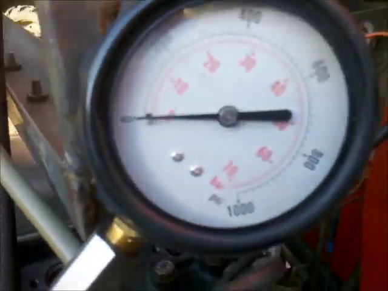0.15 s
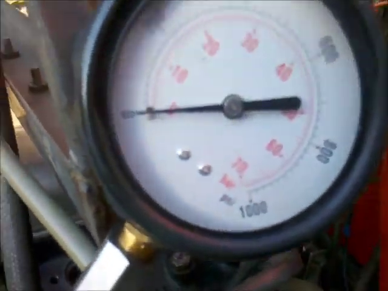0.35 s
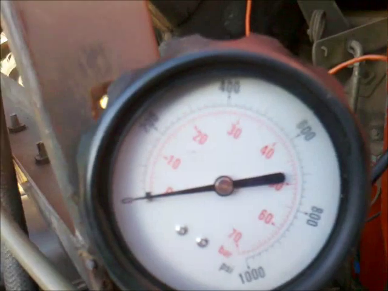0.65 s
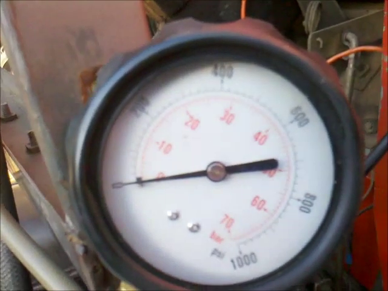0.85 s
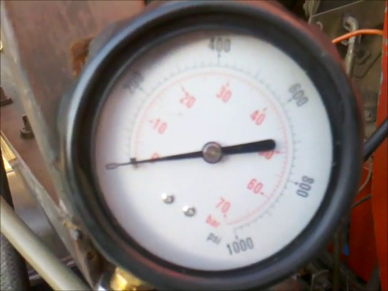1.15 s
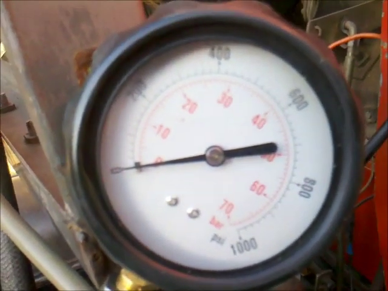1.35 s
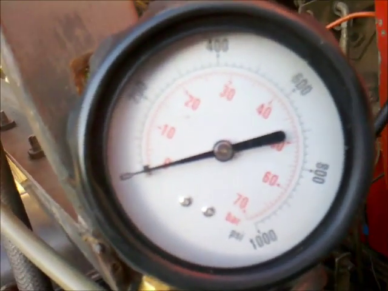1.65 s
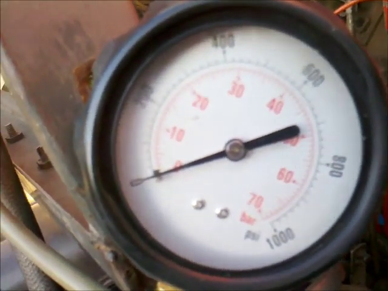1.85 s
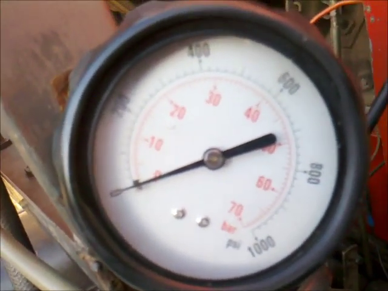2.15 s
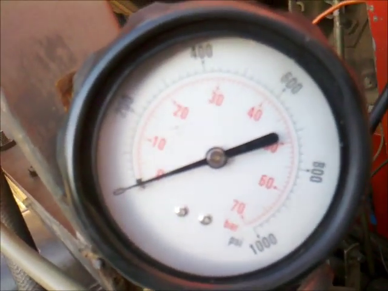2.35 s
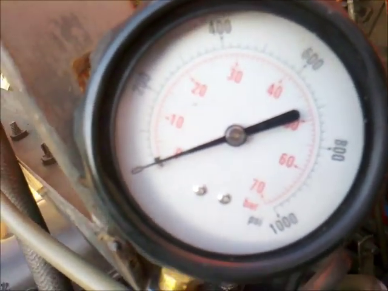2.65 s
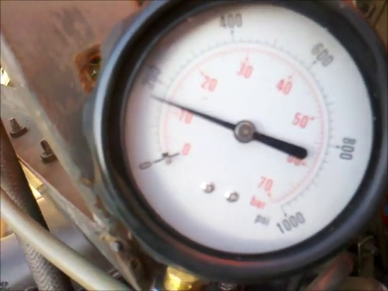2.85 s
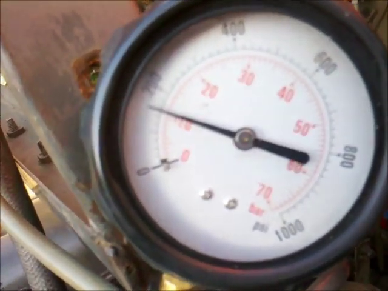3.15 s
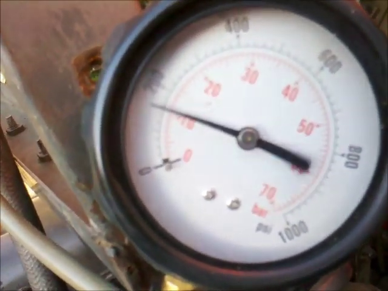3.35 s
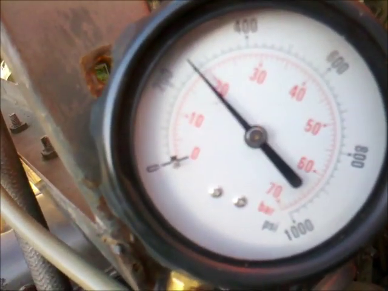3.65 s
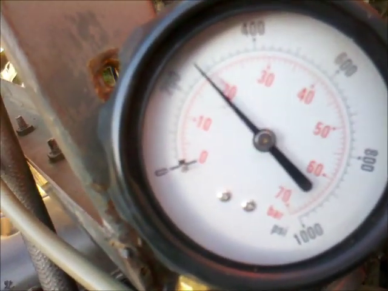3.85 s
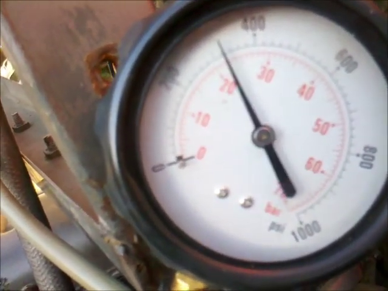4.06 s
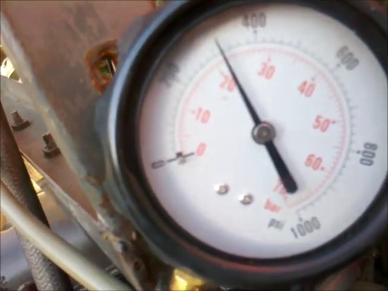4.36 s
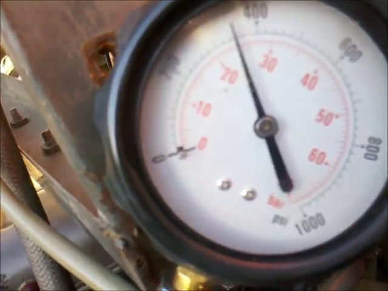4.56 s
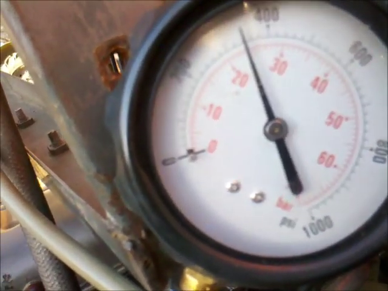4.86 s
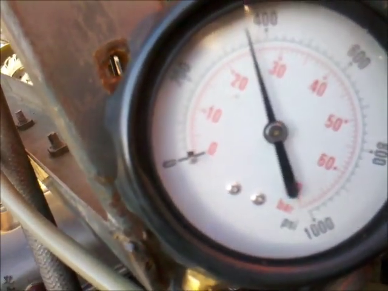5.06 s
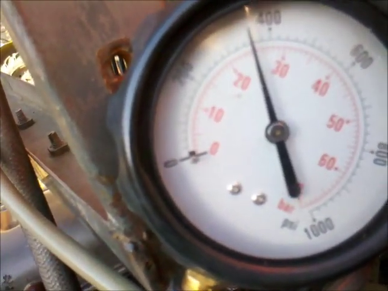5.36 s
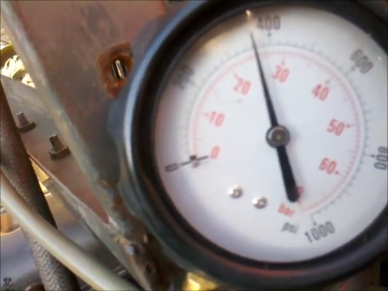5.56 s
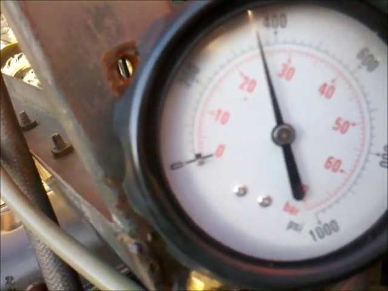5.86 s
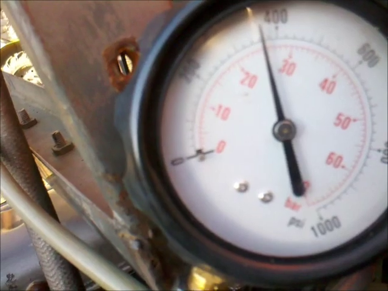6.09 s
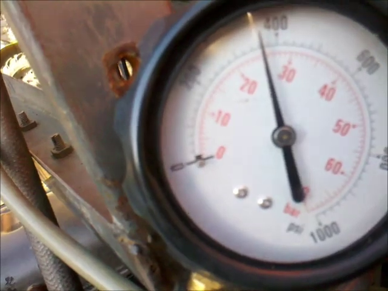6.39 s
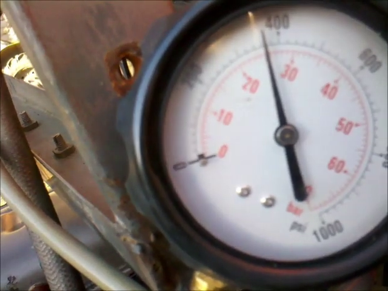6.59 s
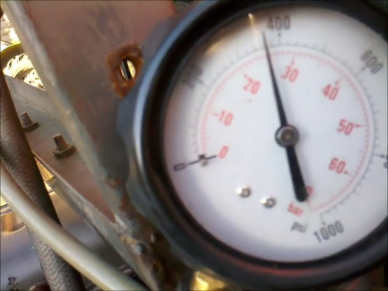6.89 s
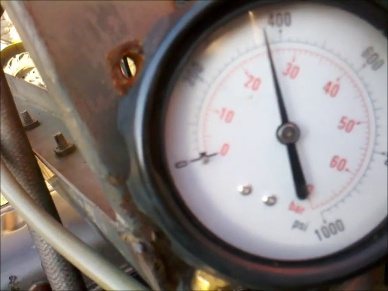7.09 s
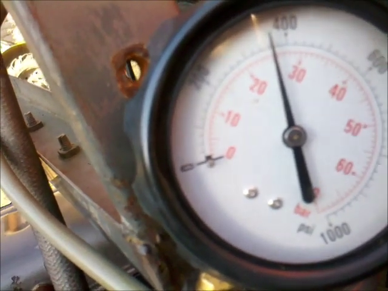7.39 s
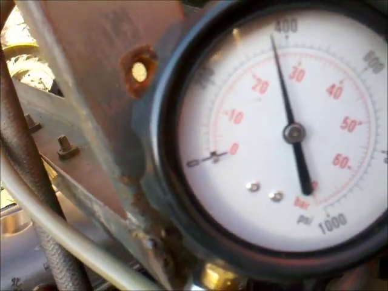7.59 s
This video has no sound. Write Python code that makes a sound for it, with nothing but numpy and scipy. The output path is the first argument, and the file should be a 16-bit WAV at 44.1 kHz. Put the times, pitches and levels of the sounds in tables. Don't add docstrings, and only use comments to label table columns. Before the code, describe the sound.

A slow-cranking diesel chuffs sharp double bursts of air over grinding starter gears, after a quiet opening of chirping sparrows and handling bumps.

```python
import sys
import numpy as np
from scipy import signal
from scipy.fft import rfft, irfft, next_fast_len
from scipy.io import wavfile
from scipy.ndimage import uniform_filter1d

SR = 44100
rng = np.random.default_rng(int(sys.argv[2]) if len(sys.argv) > 2 else 0)


def voltage_ratio(level):
    return 10 ** (np.asarray(level, float) / 20)


def dump_mix(stems):
    frames = np.atleast_2d(stems).T
    limited = np.clip(frames, -1, 1)
    pcm = np.round(limited * 32767).astype(np.int16)
    wavfile.write(sys.argv[1], SR, pcm)


N = 340923
t = np.arange(N) / SR


def evened(x):
    return x / np.sqrt(np.mean(x ** 2) + 1e-20)


def read(points, hz):
    f, value = np.transpose(points)
    return np.interp(np.log(hz + 1), np.log(f + 1), value)


def colour(x, points):
    size = next_fast_len(N)
    gain = voltage_ratio(read(points, np.fft.rfftfreq(size, 1 / SR)))
    return evened(irfft(rfft(x, size) * gain, size)[..., :N])


def air(points):
    return colour(rng.standard_normal((2, N)), points)


def flicker(ms, db):
    size = int(ms * SR / 1000)
    wander = uniform_filter1d(uniform_filter1d(rng.standard_normal(N), size), size)
    return voltage_ratio(db * evened(wander))


def patchy(x, db):
    z = signal.stft(x, nperseg=256)[2]
    patches = uniform_filter1d(rng.standard_normal(z.shape[1:]), size=6, axis=0)
    patches = evened(uniform_filter1d(patches, size=7, axis=1))
    return signal.istft(z * voltage_ratio(db * patches), nperseg=256)[1][:, :N]


def ring(x, hz, width):
    r = np.exp(-np.pi * width / SR)
    return signal.lfilter([1 - r, 0, r - 1], [1, -2 * r * np.cos(2 * np.pi * hz / SR), r * r], x)


def step(u):
    return .5 + .5 * np.tanh(u / 2)


def add(mix, s, sound):
    part = mix[..., round(s * SR):][..., :sound.shape[-1]]
    part += sound[..., :part.shape[-1]]


def shed(x, t60, wet_db):
    age = np.arange(int(.6 * SR)) / SR
    sparse = rng.random((2, len(age))) < .1
    taps = rng.standard_normal((2, len(age))) * sparse * voltage_ratio(-60 * age / t60) * (age > .004)
    taps /= np.linalg.norm(taps[0])
    return x + voltage_ratio(wet_db) * signal.fftconvolve(x * np.ones((2, 1)), taps, axes=1)[:, :N]


# (frequency [Hz], level [dB])
HISS = [(1500, -1), (4000, -16), (6500, 0), (8000, 1), (10300, 8), (11100, 7.5), (12000, 10), (13000, 8),
        (14000, 0.5)]
# (frequency [Hz], level [dB])
ROAR = [(40, -38), (120, -4.5), (350, -1.5), (800, -6.5), (2000, -4.5), (2800, -8), (4200, -3), (4900, -4),
        (5800, -11.5), (8000, -36), (14000, -14)]
# (time [s], length [ms], level [dB])
PUFFS = [(2.888, 79.6, -1), (3.033, 79.2, -0.3), (3.443, 69, -0.5), (3.565, 76.4, -0.2),
         (3.958, 68.3, -0.2), (4.08, 77, 0), (4.475, 65.5, 0.3), (4.588, 81.5, -1.5), (4.983, 72.3, 0),
         (5.102, 84, 0), (5.495, 77, -0.1), (5.625, 79, -1), (6.017, 69.8, 0.2), (6.14, 79, -1.5),
         (6.529, 73, -0.3), (6.655, 77.7, -1.5), (7.046, 74.3, -0.7), (7.168, 79.5, -0.3)]


def cylinders():
    # (length [ms], rise [ms], fall [ms], hiss [dB], roar over hiss [dB]); puffs have their own length
    wheeze, gasp, sigh = (41.5, 42, 1, -29, -8), (51, 13, 15, -31.5, -5.5), (78, 15, 24, -24, -6.5)
    first_shape, second_shape = (5, 2.5, -13.5, -4), (5.8, 2.5, -12.5, -5.5)
    strokes = [(7.557, -17, sigh)]
    for k, (first_puff, second_puff) in enumerate(zip(PUFFS[::2], PUFFS[1::2])):
        first, first_ms, first_db = first_puff
        second, second_ms, second_db = second_puff
        wheeze_lead_s = 0.064 * (0.69 if k == 0 else 1)
        strokes += [(first - wheeze_lead_s, 0, wheeze),
                    (first, first_db, (first_ms, *first_shape)),
                    (first + first_ms / 1000, 0, gasp),
                    (second, second_db, (second_ms, *second_shape)),
                    (second + 0.11, 0, sigh)]
    hiss, roar = np.zeros((2, N))
    u = np.arange(int(.3 * SR)) * 1000 / SR - 80
    for s, strength_db, (ms, rise, fall, db, roar_db) in strokes:
        shut = step((ms - u) / fall)
        full_flow = step((u - 0.15 * ms) / (rise + 6.5)) * shut ** 1.48
        add(hiss, s - .08, voltage_ratio(db + strength_db) * step(u / rise) * shut)
        add(roar, s - .08, voltage_ratio(db + strength_db + roar_db + 2.5) * full_flow)
    turbulence = flicker(5.3, 0.88) * flicker(45.0, 0.66)
    jet = air(ROAR)
    jet = np.array([jet[0], 0.15 * jet[0] + 0.95 * jet[1]])
    return patchy(turbulence * (hiss * air(HISS) + roar * flicker(9.5, 0.15) * jet), db=2.5)


# (frequency [Hz], width [Hz], level over the roar [dB])
BORES = [
    [(4850, 83, -7.5), (1980, 530, -9.5), (11760, 460, -5.5)],
    [(4250, 150, -7.5), (1433, 150, -7.5), (10500, 460, -18)],
]


def bores():
    out = np.zeros((2, N))
    for k, modes in enumerate(BORES):
        flow = np.zeros(N)
        for s, ms, db in PUFFS[k::2]:
            flow += voltage_ratio(db) * step((t - s - .012) / 0.0063) * step((s + ms / 1000 - t) * 1000 / 2.5)
        rush = rng.standard_normal((2, N))
        song = sum(voltage_ratio(db - 19) * evened(ring(rush, hz, width)) for hz, width, db in modes)
        out += flow * flicker(30, 1.57) * song
    return out


# (time [s], gear mesh [Hz], level [dB])
STARTER = [(2.579, 150.3, -33), (2.631, 195.4, -49), (2.69, 186.4, -38), (2.716, 224.5, -35.5),
           (2.76, 243.5, -35), (2.784, 224.4, -35), (2.822, 226, -37), (2.86, 300, -29.5), (2.9, 352, -32),
           (2.999, 401, -30.5), (3.1, 435, -31), (3.3, 480.5, -32), (7.101, 474, -32), (7.297, 385, -49),
           (7.401, 283, -42.5), (7.497, 199, -54), (7.73, 79, -68)]
# (multiple of the mesh [1], level [dB])
WHINE = [(1, 4), (2, -5), (3, -1), (4, 0)]
# (frequency [Hz], width [Hz], level [dB])
HOUSING = [(757, 40, 2), (905, 70, -4), (1370, 50, -4), (415, 90, -4), (1130, 120, -6), (1650, 200, -9),
           (3300, 200, -10), (3700, 300, -8), (4200, 200, -10), (4850, 250, -12)]
# (frequency [Hz], level [dB])
GRIND = [(60, 4.5), (200, 9), (800, 11), (1600, -55), (2400, 2.5), (3700, 13.5), (5200, 1.5), (7000, -65),
         (9000, -34), (12000, 3), (14000, 1)]
# (frequency [Hz], level [dB])
THROB = [(755, -6.5), (1370, -11), (905, -16), (380, -12), (1180, -17)]


def starter():
    s, *columns = np.transpose(STARTER)
    hz, load_db = (np.interp(t, s, c) for c in columns)
    first_puffs = [row[0] for row in PUFFS[2::2]]
    compressions = [puff - .066 for puff in first_puffs]
    squeeze = sum(np.exp(-((t - c) / 0.044) ** 2) for c in compressions)
    release = sum(np.exp(-((t - c - .055) / 0.056) ** 2) for c in compressions)

    teeth = np.cumsum(hz * (1 - 0.18 * squeeze) * flicker(8, 0.06)) / SR
    free = np.cumsum(hz) / SR / 10
    marks = [(.271, -7), (.123, 0), (.039, 4)]
    at, turn = np.transpose([(puff - lead, 24 * k + n) for k, puff in enumerate(first_puffs) for lead, n in marks])
    turns = free + np.interp(t, at, turn - np.interp(at, t, free))
    beat = np.exp(2.1 * (np.cos(2 * np.pi * turns) - 1)) * flicker(25, 1.4) * (1 - .35 * squeeze)
    slow = np.clip(2 - hz / 200, 0, 1)

    bite = 3.2 + np.exp(-(teeth % 1) / 0.052)
    rattle = evened((.2 + .2 * squeeze + .5 * slow + beat) * bite) * rng.standard_normal((2, N))
    shared = 0.34 * rattle[0] + 1.4 * rattle
    housing = sum(voltage_ratio(db) * ring(shared, f, w) / np.sqrt(w) for f, w, db in HOUSING)
    scrape = colour((4.9 + beat) * rng.standard_normal((2, N)), GRIND)
    scrape_db = -5.5 * squeeze + 0.84 * np.clip(2.5 - hz / 150, 0, 1)

    whine = sum(voltage_ratio(db) * flicker(14, 3.2) * np.sin(2 * np.pi * k * teeth) for k, db in WHINE)
    whine = .5 * whine + 1.1 * ring(whine, 755, 70) + .5 * ring(whine, 910, 120)
    whine_db = np.where(t < 7.2, 4.5 - 0.0404 * (hz - 200), -29)
    whine_db = whine_db - 14 * step((hz - 425) / 5.7) - 25 * np.exp(-abs(t - s[0]) / 0.045 * 3)

    throb = np.zeros(N)
    for f, db in THROB:
        tone = np.sin(2 * np.pi * np.cumsum(f * flicker(12, .08)) / SR)
        throb += voltage_ratio(db) * flicker(60, 2.0) * tone
    gears = evened(beat + 0.25 * squeeze) * (1 - slow) * throb + 0.82 * evened(housing)
    gears = gears + voltage_ratio(scrape_db) * scrape + voltage_ratio(whine_db + 0.5) * whine
    return voltage_ratio(load_db + 8.15 * squeeze - 5.7 * release) * (t > s[0]) * gears


# (time [s], level [dB], low knock over it [dB])
CLACKS = [
    (2.576, -27, -12),
    (2.5813, -10, -19),
    (2.5949, -2, -20),
    (2.6039, -12, -9),
    (2.6098, -1.5, -27),
    (2.6125, -3.5, -25),
    (2.622, -8, -11),
    (2.6246, -9, -15),
    (2.629, -13, 0),
]
# (frequency [Hz], level [dB], decay t60 [s])
PINION = [(1830, -9, 0.064), (3840, -6.5, 0.011), (4700, -7, 0.027), (5050, -13, 0.065), (9100, -24, 0.032),
          (9940, -6.5, 0.016), (11400, -5, 0.05), (12800, -4, 0.015)]


def pinion():
    out, age = np.zeros((2, N)), np.arange(3000) / SR
    for s, db, low_db in CLACKS:
        crack = rng.standard_normal((2, len(age))) * voltage_ratio(-60 * age / 0.026)
        steel = .5 * crack + sum(voltage_ratio(d) * ring(crack, f, 14.0 / t60) * 1.25 for f, d, t60 in PINION)
        knock = ring(rng.standard_normal(len(age)), 320, 193) * voltage_ratio(low_db + 11.0 - 60 * age / 0.24)
        add(out, s, voltage_ratio(db) * (steel / abs(steel).max() * 1.23 + knock))
    return out


def tappets():
    hits = np.zeros(N)
    for s, *_ in PUFFS[2::2]:
        add(hits, s - 0.11, voltage_ratio(-29.5 - 60 * t[:2000] / 0.03))
    return hits * air(ROAR)


def coasting():
    rumble = ring(rng.standard_normal((2, N)), 340, 140)
    rumble = rumble + 0.2 * ring(rng.standard_normal((2, N)), 1440, 610)
    rolling = voltage_ratio(-56.5) + voltage_ratio(-49) * step((7.43 - t) / 0.015)
    return step((t - 7.25) / 0.0067) * rolling * flicker(8.5, 5.0) * evened(rumble)


# (time [s], level [dB])
CLUNKS = [
    (7.314, -42),
    (7.344, -30.5),
    (7.369, -34),
    (7.395, -35),
    (7.422, -37),
    (7.467, -37.5),
    (7.532, -43),
    (7.565, -33.5),
    (7.634, -47),
]


def clunks():
    hits = np.zeros(N)
    for s, db in CLUNKS:
        add(hits, s, voltage_ratio(db - 3.5 - 60 * t[:3000] / 0.047))
    rattle = rng.standard_normal((2, N))
    return hits * evened(sum(voltage_ratio(db) * ring(rattle, f, 3 * w) / np.sqrt(w) for f, w, db in HOUSING))


def sweep(row, trill_hz):
    s, ms, start_hz, top_hz, end_hz, db = row
    u = np.linspace(0, 1, int(ms * SR / 1000))
    hz = (1 - u) * (1 - 2 * u) * start_hz + 4 * u * (1 - u) * top_hz + u * (2 * u - 1) * end_hz
    shake = uniform_filter1d(rng.standard_normal((2, len(u))), size=90)
    hz = hz * (1 + 0.1 * shake[0]) + trill_hz * np.sin(2 * np.pi * u * ms / 19.0)
    tone = np.sin(2 * np.pi * np.cumsum(hz) / SR)
    return s, voltage_ratio(db) * tone * (1 + 3 * shake[1]) * np.sin(np.pi * u) ** .7


# (time [s], length [ms], top [Hz], level [dB])
ARCHES = [(.205, 59, 3800, -39), (.272, 75, 3790, -42), (.865, 22, 4900, -48.5), (.989, 39, 3350, -43),
          (1.039, 39, 3260, -42.5), (1.136, 8.7, 5050, -44), (1.212, 11, 4700, -42), (1.708, 54, 3340, -44),
          (1.762, 42, 3520, -42), (2.445, 17, 3480, -45)]
# (time [s], length [ms], top [Hz], level [dB])
DROPS = [(.164, 76.5, 4250, -41.5), (.935, 49.3, 3790, -39), (.995, 37.3, 4130, -43),
         (1.705, 42.6, 4020, -37), (2.42, 45, 3960, -43)]
# (time [s], length [ms], start [Hz], end [Hz], level [dB])
SLIDES = [(0, 59, 4430, 4260, -44), (.223, 44, 4460, 4570, -37.5), (1.118, 13, 4970, 4080, -45),
          (1.159, 10, 5070, 3920, -43), (1.525, 17, 4850, 4330, -57), (1.645, 23, 2840, 4450, -44.5),
          (1.671, 33, 4440, 2780, -39), (2.025, 20, 3950, 4350, -41), (2.35, 19, 4800, 4820, -47.5),
          (2.37, 51, 4170, 2680, -41)]
# (time [s], length [ms], start [Hz], end [Hz], level [dB])
BUZZES = [(0, 95, 3850, 3206, -48), (.08, 95, 4250, 4070, -49.5), (.71, 117.6, 4570, 3290, -48),
          (.839, 134, 4720, 4600, -56), (2.014, 156.4, 4350, 3480, -46.5), (2.18, 113, 3600, 3380, -56)]


def sparrows():
    near, far = np.zeros((2, N))
    for notes, start, end in [(ARCHES, .82, .79), (DROPS, .98, .7)]:
        for s, ms, hz, db in notes:
            add(near, *sweep((s, ms, start * hz, hz, end * hz, db), 160))
    for notes, mix, trill_hz in [(SLIDES, near, 0), (BUZZES, far, 700)]:
        for s, ms, start_hz, end_hz, db in notes:
            add(mix, *sweep((s, ms, start_hz, (start_hz + end_hz) / 2, end_hz, db), trill_hz))
    return shed(.8 * near, .15, -4) + .85 * shed(far, .3, 2)


# (time [s], level [dB], frequency [Hz])
BUMPS = [
    (0.039, -48, 2150),
    (0.112, -39, 2200),
    (0.619, -47, 191),
    (0.919, -59, 2090),
    (0.959, -61, 358),
    (1.598, -34, 218),
    (1.6, -61, 480),
    (1.639, -44, 200),
]


def bumps():
    out, age = np.zeros(N), np.arange(3000) / SR
    for s, db, hz in BUMPS:
        thud = evened(ring(ring(rng.standard_normal(len(age)), hz, hz), hz, hz))
        tone = np.sin(2 * np.pi * hz * age) * voltage_ratio(-60 * age / 0.077)
        add(out, s, voltage_ratio(db - 9.0) * (thud * 1.15 + 1.3 * tone) * voltage_ratio(-60 * age / 0.13))
    return out


# (time [s], length [s], start [Hz], end [Hz], level [dB], fade [dB])
WHISTLES = [
    (0.907, .065, 2290, 1780, -74, 2),
    (1.39, 0.23, 1760, 2104, -78.5, 13),
    (1.756, 0.33, 2200, 2292, -54.5, -23),
    (2.496, 0.072, 2400, 2030, -65, 3),
]


def far_bird():
    out, glide_s = np.zeros(N), 0.15
    for s, length, start_hz, end_hz, db, fade_db in WHISTLES:
        u = np.linspace(0, 1, int(length * SR))
        glide = np.tanh(u * length / glide_s) / np.tanh(length / glide_s)
        tone = np.sin(2 * np.pi * np.cumsum(start_hz + (end_hz - start_hz) * glide) / SR)
        level = voltage_ratio(db + fade_db * u ** 0.77 + 6.0)
        add(out, s, level * tone * signal.windows.tukey(len(u), .2))
    return shed(out * flicker(8, 3.5), .3, -4)


# (frequency [Hz], level [dB])
LEAK = [(800, -7), (2000, -10.5), (5500, -15), (8000, -8.5), (9600, -6), (10500, 1.5), (11300, -5),
        (12300, 6), (13000, -3), (14000, 4)]
# (time [s], length [s], level [dB])
RUSTLES = [
    (1.67, .06, -57),
    (1.847, 0.11, -53),
]


def valve_and_sleeve():
    ms = t * 1000
    valve = voltage_ratio(-53) + voltage_ratio(-45.5 - 3 * t) * step((ms - 85) / 3.7)
    flow = valve * step((550 - ms) / 48)
    for s, length, db in RUSTLES:
        flow = flow + voltage_ratio(db) * step((t - s) / .006) * step((s + length - t) / 0.018)
    return flow * air(LEAK) * flicker(33.0, 1.2)


# (frequency [Hz], level [dB])
YARD = [(50, -22), (110, 2), (200, 3.5), (300, -0.5), (370, 4), (450, -2), (600, -7), (1000, -14),
        (2000, -17.5), (4000, -13.5), (6000, -28)]


def background():
    self_noise = air([(100, -12), (6000, -3), (10000, 1), (14000, 3.5)])
    return voltage_ratio(-56.5) * flicker(60, 1.2) * air(YARD) + voltage_ratio(-63) * self_noise


def scene():
    engine = cylinders() + bores() + starter() + pinion() + tappets() + coasting() + clunks()
    left, right = sparrows()
    birds = np.array([left, np.roll(right, 170)])
    faint = (far_bird() + bumps()) * voltage_ratio([[0], [-5.0]])
    return shed(engine, 0.12, -11.0) + birds + faint + valve_and_sleeve() + background()


# (frequency [Hz], phase [rad])
TURN = [(80, -3.13), (200, -2.95), (600, -2), (1100, 0), (2100, .2), (2600, -2.9), (3000, -2.85),
        (3700, -3.1), (4500, -4.6), (5400, -6.2), (6100, -7), (6800, -6.4), (8200, -3.7), (8900, -.25),
        (9700, 0), (10300, .5), (11000, 3.4), (11700, 5.7), (12300, 6.2), (12900, 6.6), (13900, 9.4)]
# (frequency [Hz], share [0-1])
SHARED = [(50, 0.99), (130, 0.9), (380, 0.66), (650, 0.32), (1650, 0.91), (2050, 0.25), (2350, 0.05),
          (2750, 0.41), (3200, 0.65), (3700, 0.64), (4250, 0.55), (4700, 0.68), (5550, 0.73), (5950, 0.27),
          (6600, 0.19), (8600, 0.1), (9050, 0.76), (9500, 0.76), (10100, 0.63), (10700, 0.15), (11400, 0.3),
          (11850, 0.72), (12300, 0.97), (12850, 0.6), (13300, 0.251), (13900, .93)]


def top_cut(x):
    return signal.sosfilt(signal.butter(12, 14420, fs=SR, output="sos"), x)


def record(dry):
    size = next_fast_len(N + 4096)
    hz = np.fft.rfftfreq(size, 1 / SR)
    a, b = rfft(1.325 * np.tanh(dry / 1.23), size)
    shared = np.clip(read(SHARED, hz), 0, 1)
    right = np.exp(1j * read(TURN, hz)) * (shared * a + np.sqrt(1 - shared ** 2) * b)
    edge = 1 / (1 + (hz / 13990) ** 160) / (1 + (60 / (hz + 1)) ** 4)
    mix = irfft(np.array([a, right]) * edge, size)[:, :N]
    return top_cut(np.clip(mix, -1, 1))


dry = scene()
out = record(dry)
dump_mix(out)
```